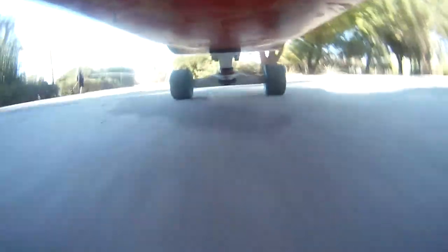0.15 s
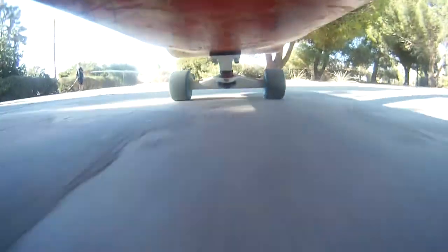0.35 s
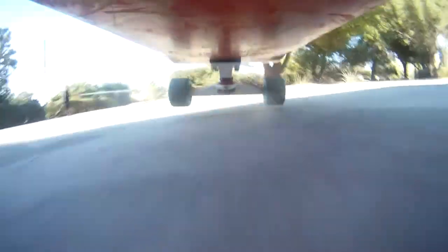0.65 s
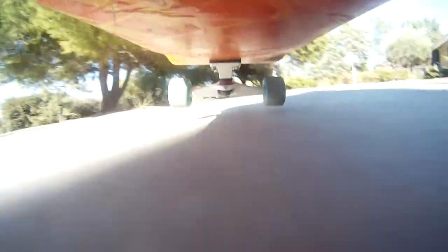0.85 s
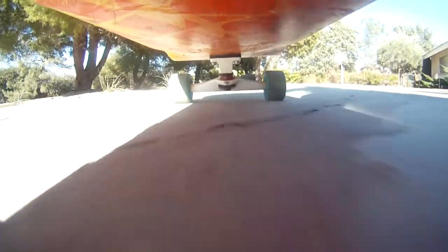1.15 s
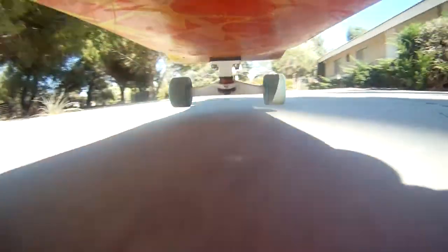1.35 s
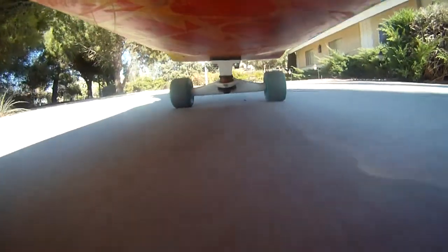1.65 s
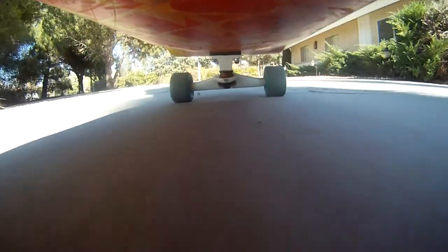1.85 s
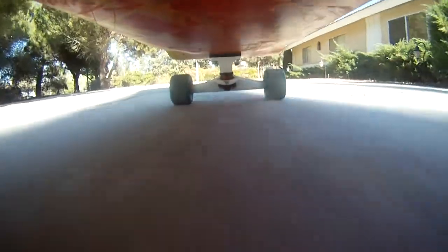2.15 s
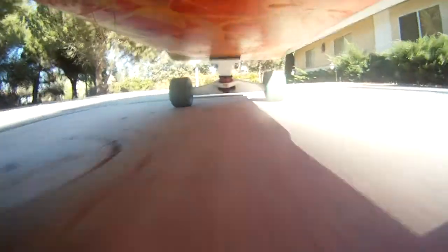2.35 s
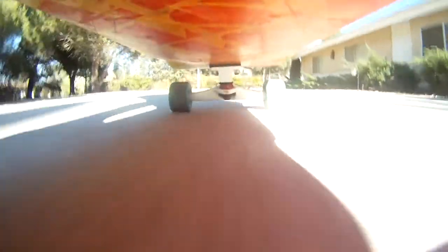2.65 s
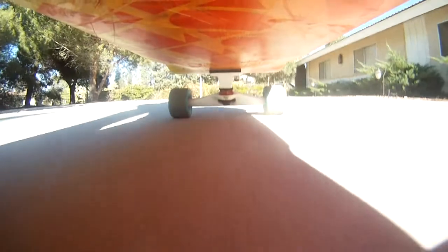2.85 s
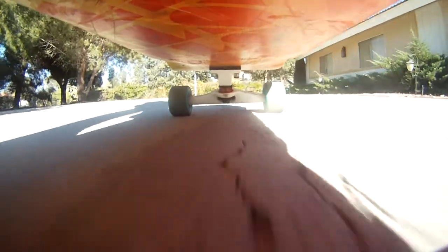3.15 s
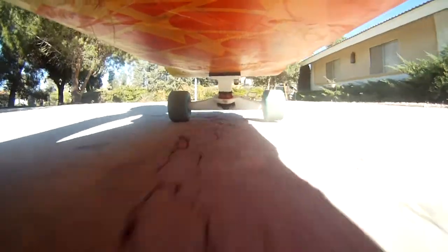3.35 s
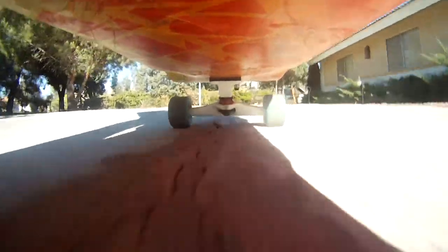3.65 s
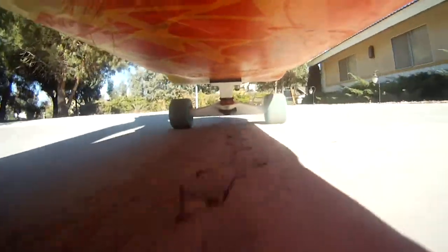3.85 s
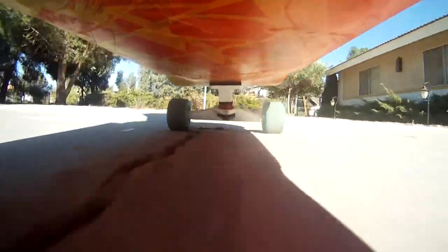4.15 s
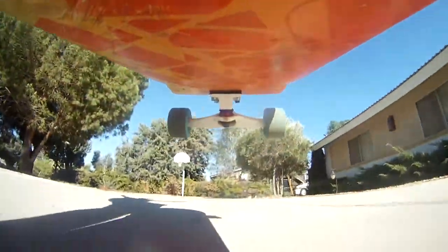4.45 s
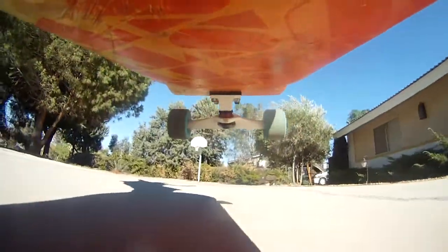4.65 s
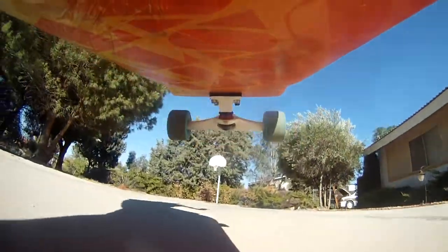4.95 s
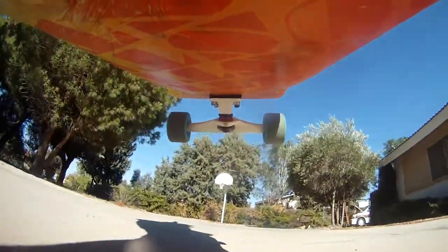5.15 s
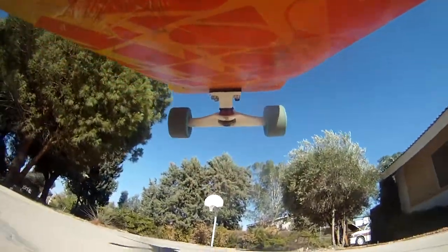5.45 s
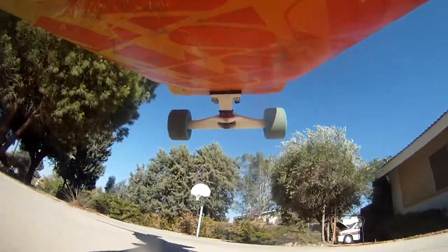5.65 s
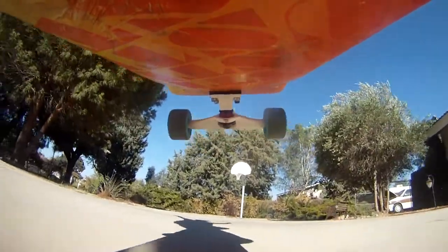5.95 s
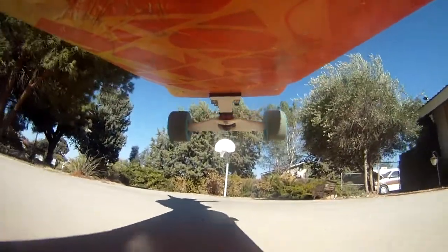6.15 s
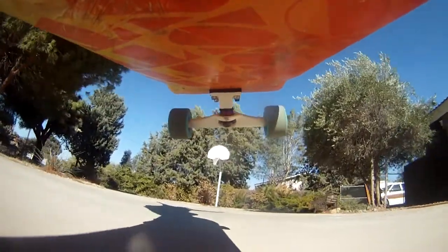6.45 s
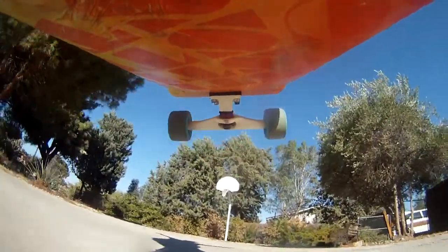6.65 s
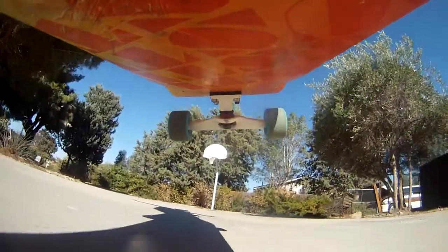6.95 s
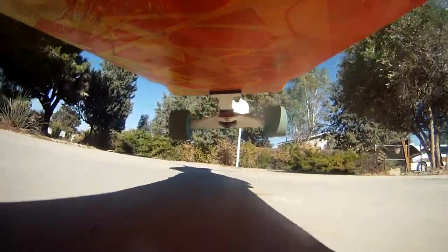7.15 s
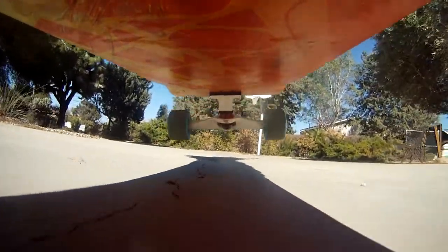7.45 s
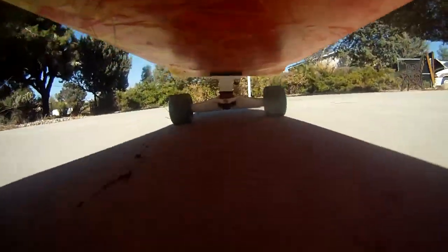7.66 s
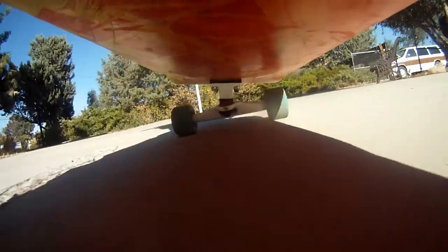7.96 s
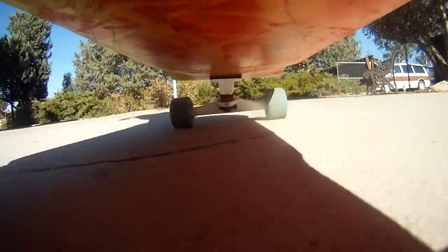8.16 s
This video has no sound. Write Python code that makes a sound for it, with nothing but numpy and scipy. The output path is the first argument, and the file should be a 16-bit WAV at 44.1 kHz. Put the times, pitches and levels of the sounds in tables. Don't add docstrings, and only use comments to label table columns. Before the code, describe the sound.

A skateboard rumbles over rough concrete with hollow wooden roar, rattling loose metal and hard distorted slams at cracks, then a humming, scraping wheelie.

```python
import sys
import numpy as np
from scipy import signal
from scipy.io import wavfile
from scipy.ndimage import uniform_filter1d

SR = 44100
rng = np.random.default_rng(int(sys.argv[2]) if len(sys.argv) > 2 else 0)


def file_out(sig):
    cols = np.atleast_2d(sig).T
    lim = np.clip(cols, -1, 1)
    pcm = np.round(lim * 32767).astype(np.int16)
    wavfile.write(sys.argv[1], SR, pcm)


def boost_factor(decibels):
    exponent = np.asarray(decibels, float) / 20
    return 10 ** exponent


N = 366471
TIME = np.arange(N) / SR

# time in s, clack in dB, thump in dB, drop of the camera's gain in dB.
SLAMS = [(0.087, 4, -7.5, 1), (.104, 1, -18, 20.5), (.14, 0, -9.5, 17.5), (0.58, -2.5, -5.5, 7.5),
         (.953, 1.5, -6, 13), (0.979, 0, -6, 21), (1.113, 2.5, 2, 8), (1.123, 3.5, 1, 9.5),
         (1.261, 2, -11, 29), (1.455, 14, -7, 49), (1.465, 7, -8, 6), (2.073, 2.5, -9, 53),
         (2.243, 8, 4, 33), (2.416, 9.5, 3.5, 60.5), (2.52, 16.5, 5, 37), (2.686, 14, -16, 72.5),
         (3.195, -27, -8, 11), (3.23, -1, -3.5, -7), (3.496, 1, 1.5, 47), (3.501, 0.5, -7, -1),
         (3.673, 0.5, 5, 43.5), (4.383, 10.5, -0.5, 76), (5.379, -3, -31, 2.5), (5.669, -8.5, -22, 5.5),
         (7.599, 12, -10, 59), (7.603, 7.5, -7, 0.5)]
# time in s, blow in dB.
BUMPS = [(0.048, -14), (0.354, -5), (.408, -2.5), (0.553, -6.5), (0.667, 0), (0.706, -4), (0.750, -2.5),
         (0.846, -6.5), (1.193, 0.5), (1.646, -21), (2.037, -1), (2.195, 7), (2.226, 7.5), (2.402, 2),
         (2.703, 10.5), (3.056, -7), (3.343, -5.5), (3.614, -9), (3.814, -16), (4.048, -15), (4.157, -18),
         (4.207, -3.5), (4.238, -6), (4.35, -7.5), (4.371, 2)]
# time in s, blow in dB.
LATE_BUMPS = [(4.597, -6), (4.613, -2), (4.91, -6.5), (5.032, -7), (5.07, -8), (5.125, -6), (5.378, -2),
              (5.527, -5.5), (5.67, -5), (5.829, -6), (5.881, -10), (6.122, -13), (6.199, -7), (6.334, -27),
              (6.515, -17), (6.732, -3), (6.824, -19), (7.055, -4.5), (7.139, -9), (7.303, 0),
              (7.546, -4.5), (7.77, 1), (7.861, -7.5), (7.927, -7), (7.962, -13), (7.998, -2.5),
              (8.021, -12), (8.13, -27)]
# frequency in Hz, width in Hz, level in dB.
BODY = [(157.6, 29, -10.5), (309, 45.4, -4.5), (409.5, 83.4, -3.5), (519, 78.3, 0), (601, 71, 1.5),
        (699.5, 138, -9), (1059, 75, -14.5), (1454, 69, -26)]
# frequency in Hz, width in Hz, level in dB.
CASE = [(2740, 1390, 2), (3400, 656, 9), (5220, 2800, 0)]
# frequency in Hz, width in Hz, level in dB.
AXLE = [(3976, 390, 39), (4660, 300, -10)]
# frequency in Hz, width in Hz, level in dB.
TRUCK = [(734, 310, -0.5), (1078, 155, 1.5), (1477, 195, -5.5)]


def level(x, db):
    return x * boost_factor(db) / np.sqrt(np.mean(x ** 2))


def ring(x, modes):
    out = np.zeros(len(x))
    for k, (hz, width_hz, db) in enumerate(modes):
        b, a = signal.iirpeak(hz, hz / width_hz, fs=SR)
        out += (-1) ** k * boost_factor(db) * signal.lfilter(b, a, x)
    return out


def strike(times, db, modes, push_s, scatter_db, bounce_s, rebound=0.49):
    push = np.sin(np.pi * np.arange(.5, push_s * SR) / (push_s * SR))
    peak = np.abs(ring(np.pad(push, (0, SR // 10)), modes)).max()
    chance = rng.standard_normal((len(times), len(modes) + 2))
    first = (np.asarray(times) * SR).astype(int)
    second = first + (bounce_s * SR * boost_factor(3 * chance[:, -1])).astype(int)
    out = np.zeros(N)
    for k, mode in enumerate(modes):
        size = (-1) ** k * np.sign(chance[:, -2]) * boost_factor(db + scatter_db * chance[:, k])
        kicks = np.zeros(N)
        np.add.at(kicks, first % N, size)
        np.add.at(kicks, second % N, -rebound * size)
        out += ring(np.convolve(kicks, push)[:N], [mode])
    return out / peak


def grit(rate, rough_db):
    k = int(SR / rate)
    steps = np.repeat(rng.standard_normal(N // k + 1), k)
    walk = uniform_filter1d(steps, k)[:N]
    return boost_factor(rough_db * walk) * rng.standard_normal(N)


def swells(rows):
    out = np.zeros((len(rows[0]) - 2, N))
    for centre, length, *db in rows:
        hump = np.cos(np.pi * np.clip((TIME - centre) / length, -.5, .5)) ** 2
        out += np.outer(db, hump)
    return out


def ducking():
    fall_s, rise_s = 0.032, 0.092
    duck_db = np.zeros(N)
    for s, *_, depth_db in SLAMS:
        after = np.maximum(TIME - s, 0)
        duck_db -= depth_db * (1 - np.exp(-after / fall_s)) ** 2 * np.exp(-after / rise_s)
    return duck_db


def plank_flex(flex_db):
    # frequency in Hz, width in Hz, level in dB.
    bend_modes = [(39.7, 54, -10), (77.4, 33.7, 0), (98.8, 26.3, 3), (163.7, 25, -6), (232, 28.4, -8.5),
                  (1370, 2500, -35.5)]
    return boost_factor(flex_db) * level(ring(grit(30, 2.2), bend_modes), 0)


def deck_roar(body_db, low_db):
    shake = grit(90, 1.1)
    roar = boost_factor(low_db) * ring(shake, BODY[:2]) + ring(shake, BODY[2:])
    return boost_factor(body_db) * level(roar, 0.9)


def bearings(hiss_db, axle_db):
    # frequency in Hz, width in Hz, level in dB.
    hiss_modes = [(1890, 410, -1), (3117, 360, 5), (4280, 430, 0), (5100, 420, -6.5)]
    hiss = level(ring(grit(700, 4.5), hiss_modes), -1.5)
    axle_ring = level(ring(grit(130, 6.5), AXLE), -5.5)
    return boost_factor(hiss_db) * (hiss + boost_factor(axle_db) * axle_ring)


def ticks(axle_db, flex_db):
    place, luck = rng.random((1300, 2)).T
    tick_db = -13 - 3.5 * np.log(1 - .95 * luck)
    sound = strike(place * N / SR, tick_db, CASE, push_s=.00012, scatter_db=3.0, bounce_s=.0008, rebound=.3)
    return boost_factor(flex_db - .7 * np.maximum(axle_db, 0)) * sound


def trucks(body_db, flex_db):
    drive_db = -14.5 + body_db + 0.99 * (flex_db - body_db)
    judder = level(ring(grit(120, 4), TRUCK), 0)
    hit_s, hit_db = np.transpose(BUMPS + LATE_BUMPS + [slam[:2] for slam in SLAMS])
    clanks = strike(hit_s, hit_db - 13.5, TRUCK, push_s=0.00031, scatter_db=3.4, bounce_s=0.00393)
    return boost_factor(drive_db) * judder + clanks


def knocks(axle_db):
    # time in s, level as heard in dB.
    early_knocks = [(0.0256, -23), (0.0326, -16.5), (0.057, -14), (0.0605, -13.5), (0.0888, 1),
                    (0.1027, 0.5), (0.1211, -29), (0.1332, -17.5), (0.2022, -25), (0.2135, -24),
                    (0.2266, -25), (0.244, -24), (0.2614, -16), (0.2733, -20), (0.2907, -9.5), (0.3303, -8),
                    (0.3587, -4.5), (0.409, -12.5), (0.4284, -16), (0.443, -22), (0.4599, -9.5),
                    (0.469, -23), (0.477, -19.0), (0.4898, -15), (0.4989, -16), (0.5103, -12), (0.518, -23),
                    (0.5432, -8), (0.5604, -25), (0.5672, -6), (0.5833, -16), (0.5889, -25.5), (0.631, -21),
                    (0.6444, -16), (0.6519, -9.0), (0.6654, -9), (0.6729, -14), (0.6793, -13.0),
                    (0.6876, -19), (0.7085, -22), (0.7205, -10), (0.751, -16.0), (0.7559, -8.5),
                    (0.763, -14.0), (0.7792, -10), (0.784, -15), (0.8492, -19), (0.8556, -17),
                    (0.8805, -16), (0.951, -5), (0.956, -5), (0.959, -3), (0.9663, -14), (0.9734, -16),
                    (0.9807, -12), (0.984, -8.0), (0.9948, -24), (1.0432, -19), (1.0841, -18),
                    (1.1166, -3.5),
                    (1.1245, -5), (1.129, -7), (1.1375, -14), (1.1467, -24), (1.1924, -20), (1.2408, -3.5),
                   (1.245, -7), (1.261, 0.5), (1.269, -3), (1.2741, -7), (1.2954, -11), (1.3179, -23),
                   (1.457, -8), (1.463, -11), (1.4672, -8), (1.475, -15), (1.4802, -18), (1.4895, -29),
                   (1.5121, -34), (1.543, -26), (1.6256, -22), (1.654, -18), (1.753, -17.5), (1.852, -18),
                   (1.941, -6), (1.9844, -4.5), (1.9887, -10), (2.04, -12), (2.0455, -12), (2.0557, -14),
                   (2.0751, -0.5), (2.0854, -19), (2.102, -25), (2.1058, -19), (2.1143, -22), (2.1418, -31),
                   (2.1621, -27), (2.168, -32), (2.1983, -13), (2.201, -18), (2.2069, -21), (2.2333, -10),
                   (2.2404, -4), (2.258, -7), (2.276, -10.5), (2.2884, -10), (2.2971, -13), (2.3038, -11),
                   (2.3286, -22.0), (2.3381, -21), (2.3489, -22), (2.3552, -19), (2.3643, -15),
                   (2.373, -18), (2.382, -21.0), (2.4037, -15), (2.408, -14), (2.4173, -6), (2.4408, -21),
                   (2.4537, -24),
                    (2.467, -39), (2.4976, -36), (2.5125, -12), (2.519, -9.5), (2.5354, -26),
                   (2.5538, -16.5), (2.565, -21), (2.5901, -35), (2.5996, -25), (2.6287, -30),
                   (2.664, -14.5), (2.6748, -12), (2.686, -16), (2.693, -8), (2.704, -13), (2.717, -24),
                   (2.8136, -22), (2.8467, -13.5), (2.8563, -22), (2.8806, -21), (2.9831, -16),
                   (3.0608, -19), (3.064, -1.5), (3.071, -22), (3.0835, -25), (3.1229, -11.5),
                   (3.1307, -25), (3.141, -20), (3.147, -15), (3.151, -20.5), (3.1558, -10),
                   (3.1624, -21.5), (3.1747, -22.0), (3.179, -19), (3.195, -8), (3.1999, -26), (3.205, -16),
                   (3.235, -10), (3.241, -14.5), (3.2487, -19.5), (3.254, -21.5), (3.2623, -22),
                   (3.2843, -19), (3.2899, -22), (3.2987, -24), (3.3074, -23.0), (3.337, -16.5),
                   (3.3407, -12), (3.3462, -9), (3.3513, -10), (3.3604, -11), (3.369, -11), (3.374, -12.5),
                   (3.383, -16), (3.3862, -12), (3.39, -13), (3.412, -10), (3.4176, -16), (3.4254, -11.5),
                   (3.4381, -24)]
    # time in s, level as heard in dB.
    late_knocks = [(3.4526, -25), (3.4742, -16), (3.482, -5), (3.4884, -12.0), (3.4951, -9), (3.5, 0),
                   (3.5211, -22.5), (3.5306, -22), (3.5483, -33.5), (3.5593, -37.0), (3.5705, -34.0),
                   (3.5791, -33), (3.5921, -37), (3.6138, -22), (3.617, -21), (3.6238, -26), (3.6485, -16),
                   (3.6536, -16), (3.6624, -16), (3.6734, -7), (3.701, -23), (3.7157, -35.5),
                   (3.7337, -34.5), (3.745, -29), (3.7513, -22), (3.7564, -25), (3.7663, -22.0),
                   (3.7746, -18.5), (3.7789, -21.0), (3.7934, -24.5), (3.8033, -27.5), (3.8082, -25),
                   (3.8122, -15.5), (3.8165, -20), (3.8445, -28), (3.8584, -21), (3.871, -17.5),
                   (3.8893, -20), (3.9454, -20), (3.9593, -21), (3.9649, -20.5), (4.002, -17),
                   (4.0333, -20.5), (4.0383, -19), (4.0458, -21), (4.065, -18), (4.069, -20), (4.2395, -9),
                   (4.244, -10), (4.2661, -16), (4.2784, -7.5), (4.2921, -15), (4.3394, -10), (4.352, -10),
                   (4.3842, -11), (4.4182, -36.0), (4.4234, -35), (4.4356, -36), (4.5553, -27.0),
                   (4.6159, -21),
                   (4.7141, -9), (4.7257, -18), (4.7419, -11), (4.7482, -14), (4.7731, -19),
                      (4.7836, -4), (4.7969, -19), (4.8192, -15), (4.8449, -21), (4.8493, -13),
                      (4.8553, -17), (4.862, -15), (4.8727, -18), (4.8788, -20.0), (4.884, -18),
                      (4.8897, -10), (4.8961, -21), (4.9559, -14.5), (4.9614, -29), (4.9692, -24.5),
                      (5.004, -27), (5.0641, -12.5), (5.076, -10), (5.0882, -21.0), (5.0937, -26),
                      (5.1189, -27), (5.1495, -27), (5.1777, -14), (5.1846, -13.0), (5.1972, -22),
                      (5.2021, -20), (5.2131, -18), (5.217, -22), (5.2204, -16), (5.2492, -15),
                      (5.2538, -18.0), (5.259, -17), (5.2672, -25), (5.275, -15), (5.3457, -26),
                      (5.3812, -1.5), (5.6683, -7), (5.8153, -21), (5.8207, -12), (5.8775, -19.5),
                      (5.897, -15.5), (5.9022, -15.5), (5.9587, -26), (6.062, -19.5), (6.0676, -23),
                      (6.1955, -20.5), (6.202, -13), (6.2273, -21), (6.2348, -20), (6.2746, -22),
                      (6.309, -31), (6.4542, -23), (6.4611, -24), (6.4707, -26), (6.4769, -39),
                   (6.5173, -16.5), (6.5518, -23), (6.5635, -17.5), (6.5692, -23.5), (6.6292, -13),
                      (6.6337, -17), (6.638, -20.5), (6.738, -5), (7.0927, -17), (7.3355, -10),
                      (7.4381, -10.5), (7.45, -15), (7.4634, -11.5), (7.4711, -27), (7.4749, -26),
                      (7.543, -3.5), (7.6034, 0), (7.6897, -23), (7.7147, -28), (7.726, -21.5),
                      (7.7379, -34), (7.7628, -18), (7.774, -13.5), (7.7911, -23), (7.7981, -22),
                      (7.804, -20), (7.847, -15.5), (7.864, -15.5), (7.875, -16), (7.887, -17),
                      (7.9035, -24), (7.9162, -11.5), (7.947, -18), (7.9554, -12), (7.9968, -23),
                      (8.0096, -25), (8.0141, -22), (8.0174, -7), (8.022, -23), (8.0302, -17), (8.033, -9),
                      (8.0426, -19), (8.047, -17), (8.051, -14), (8.0554, -15), (8.0596, -12),
                      (8.0667, -9.5), (8.0717, -15), (8.096, -16), (8.1013, -20.0), (8.1187, -17.5),
                      (8.1294, -18.5), (8.1451, -9), (8.1498, -24), (8.1543, -24), (8.1643, -28),
                      (8.193, -7.5), (8.2186, -15), (8.253, -22), (8.2623, -25)]
    early = early_knocks
    late = late_knocks
    s, heard_db = np.transpose(early + late)
    db = heard_db - np.interp(s, TIME, ducking())
    lean_db = np.interp(s, TIME, axle_db)
    case_db = db + 0.5 - 0.3 * np.maximum(lean_db, 0)
    axle_hit_db = db - 10.5 + 0.5 * np.minimum(lean_db, 24)
    out = strike(s, case_db, CASE, push_s=.00012, scatter_db=1.08, bounce_s=0.00054, rebound=0.19)
    out += strike(s + 0.001795, db - 13.5, CASE, push_s=0.00012, scatter_db=3.4, bounce_s=.0016, rebound=0.85)
    out += strike(s, axle_hit_db, AXLE, push_s=0.00028, scatter_db=3.6, bounce_s=0.001026)
    return out


def bumps():
    s, db = np.transpose(BUMPS + LATE_BUMPS)
    return strike(s, db - 4.0, BODY, push_s=0.00056, scatter_db=5.4, bounce_s=0.003)


def slams():
    # frequency in Hz, width in Hz, level in dB.
    clack_modes = [(391, 288, -2), (572, 197, 2), (1107, 86, -5.5), (1310, 170, -10)]
    # frequency in Hz, width in Hz, level in dB.
    thump_modes = [(110, 260, -4), (223, 150, 3)]
    s, clack_db, thump_db, _ = np.transpose(SLAMS)
    clacks = strike(s - .0007, clack_db, clack_modes, push_s=0.00067, scatter_db=1.0, bounce_s=0.00463)
    thumps = strike(s, thump_db, thump_modes, push_s=0.0015, scatter_db=0.35, bounce_s=0.00422)
    cracks = strike(s + 0.0022, clack_db - 10.5, CASE, 0.00016, scatter_db=0.82, bounce_s=0.002, rebound=0.43)
    return clacks + thumps + cracks


def squeak():
    # start in s, end in s, first pitch in Hz, last pitch in Hz, level in dB.
    slip = (.333, .372, 4200, 5050, -22)
    start, end, from_hz, to_hz, db = slip
    part = np.clip((TIME - start) / (end - start), 0, 1)
    wobble = 25 * uniform_filter1d(rng.standard_normal(N), size=60)
    hz = (from_hz + (to_hz - from_hz) * part ** 0.48) * (1 + 0.0052 * wobble)
    fade = np.sqrt(np.sin(np.pi * part).clip(0))
    return boost_factor(db) * fade * np.sin(2 * np.pi * np.cumsum(hz) / SR)


def swings():
    # time in s, swing in dB.
    weight_drops = [(0.454, -9), (.55, -8), (2.038, -15), (2.554, 8), (3.101, -6.5), (3.143, -7),
                    (3.199, -7.5), (3.612, -1), (3.631, -5), (4.162, -17), (7.767, -5.5), (8.191, -14.5)]
    # frequency in Hz, width in Hz, level in dB.
    plank_modes = [(65, 5.4, -2), (94, 14, 1.5), (152, 41, -5.5)]
    s, db = np.transpose(weight_drops)
    return strike(s, db, plank_modes, push_s=0.0035, scatter_db=0.58, bounce_s=0.0067)


def slack():
    # time in s, level in dB.
    clanks = [
        (.952, -3.5),
        (1.8, -4),
        (.705, -13),
    ]
    s, db = np.transpose(clanks)
    return strike(s, db, TRUCK[1:], push_s=0.00022, scatter_db=0, bounce_s=0.00328)


def wheelie(body_db):
    # frequency in Hz, width in Hz, level in dB.
    pivot_modes = [(87.2, 7, 0.5), (159.3, 9.3, -2.5)]
    lifted = (TIME > 4.45) & (TIME < 7.58)
    fade = uniform_filter1d(1. * lifted, size=2000)
    return fade * boost_factor(body_db - 12.5) * level(ring(grit(25, 3.0), pivot_modes), 0)


def tail():
    # time in s, level in dB.
    drags = [
        [(5.3795, -7), (5.39, -16.5), (5.5, -14.5), (5.6, -14), (5.675, -15.5), (5.69, -17), (5.735, -19),
         (5.742, -58)],
        [(6.733, -16), (6.745, -11.5), (6.78, -16.5), (6.788, -29)],
        [(6.615, -34), (6.632, -30.5), (6.655, -35)],
        [(4.778, -14.5), (4.79, -32)],
        [(7.53, -30), (7.544, -23), (7.555, -24)],
    ]
    # frequency in Hz, width in Hz, level in dB.
    tail_modes = [(745, 150, -10.5), (1070, 110, 0.5), (1400, 750, -8), (2420, 1700, -8), (2830, 250, -1),
                  (3680, 520, -11.5), (5080, 1330, -11.5)]
    envelope = np.zeros(N)
    for drag in drags:
        s, db = np.transpose(drag)
        envelope += boost_factor(np.interp(TIME, s, db, left=-99, right=-99))
    chatter = grit(1800, 4) * grit(110, .4)
    return envelope * level(ring(chatter, tail_modes), 0)


def scene():
    # time in s, shake by the surface in dB, plank flex over shake in dB,
    # bearing load over shake in dB, axle ring over case ring in dB.
    roll = [(0, -30.5, 2.5, -24.5, 12), (.25, -24, 2.5, -13.5, 5.5), (.6, -26.5, 3.5, -20, 3),
            (.95, -22.5, 1, -13, 0.5), (1.3, -13.5, 3.5, -20, 9.5), (1.5, -22, -10, -13.5, 0),
            (1.85, -15, -3, -34, 15.5), (2.1, -16.5, 3.5, -24, -1), (2.7, -13, -1.5, -18, 1),
            (2.95, -17, -5, -15, -1.5), (3.3, -25, 2.5, -26.5, -6), (4.0, -21.5, 0, -17.5, 3),
            (4.55, -17, -13, -14.5, 3), (5.2, -18.5, -10, -18.5, -33), (6.0, -23.5, -5, -22.5, -2),
            (6.85, -22, -8.5, -18.5, -13), (7.5, -19, -0.5, -16.5, -3), (8.31, -21, 1, -25, -1.5)]
    # centre in s, length in s, extra shake in dB, extra flex in dB.
    patches = [(0.115, 0.15, 1.5, 3), (0.411, 0.31, 6.5, 1), (0.717, 0.39, 7.5, -4.5), (1.08, 0.14, 7, -8),
               (1.304, 0.13, 8, 1), (1.58, 0.39, 6.5, 5), (2.002, 0.16, -2.5, 7), (2.25, 0.26, 10.5, -3.5),
               (2.532, 0.29, 9, 1.5), (2.737, 0.24, 4, 9), (3.1, 0.22, 1.5, 5.5), (3.416, 0.25, 6, -3.5),
               (3.722, 0.49, 11.5, -7), (4.188, 0.24, 5, 6.5), (4.395, 0.23, 0.5, 10),
               (4.777, 0.51, 5, -0.5), (5.275, 0.39, 5, -1), (5.546, 0.5, 2.5, -7), (5.834, 0.28, 6, -6),
               (6.161, 0.35, 10.5, -7.5), (6.325, 0.15, 6, 1.5), (6.48, 0.27, 9.5, -3.5),
               (6.715, 0.32, 2, -5), (7.061, 0.52, 6, -4.5), (7.244, 0.3, 4.5, 0), (7.464, 0.08, 2, 8),
               (8.032, 0.36, 4.5, -12), (8.31, 0.063, 6.5, -2)]
    # centre in s, length in s, change of the lowest deck tones in dB,
    # change of the bearing hiss in dB.
    shifts = [(.7, 0.37, -2, 4.5), (1.62, 0.16, 4, 0), (3.4, .3, 0, 7), (4.2, 0.13, 0, 6),
              (4.95, 1, 1, -1.5), (5.7, 0.31, 4.5, 0), (7.2, 0.68, -0.5, 5.5), (7.68, 0.11, -4, 8),
              (8.05, 0.45, 4.5, 3)]
    # centre in s, length in s, extra ring in dB.
    loose = [(.77, 0.074, 4), (1.08, 0.035, 0), (1.42, 0.093, 4), (3.41, .1, 4), (4.07, 0.13, -6),
             (5.58, .15, 14), (6.05, 0.24, 11), (7.2, 0.43, 7.5), (7.7, 0.21, 24.5), (7.89, 0.2, 26),
             (8.21, 0.05, 24), (8.255, 0.11, 24)]
    s, *columns = np.transpose(roll)
    shake_db, flex_db, load_db, axle_db = (np.interp(TIME, s, column) for column in columns)
    patch_db, bend_db = swells(patches)
    low_db, press_db = swells(shifts)
    body_db = shake_db + patch_db
    flex_db = body_db + flex_db + bend_db
    hiss_db = shake_db + load_db + 0.9 * patch_db + press_db
    axle_db = axle_db + swells(loose)[0]

    sound = plank_flex(flex_db) + deck_roar(body_db, low_db)
    sound += bearings(hiss_db, axle_db) + ticks(axle_db, flex_db)
    sound += trucks(body_db, flex_db)
    sound += knocks(axle_db) + bumps() + slams()
    sound += squeak() + swings() + slack()
    sound += wheelie(body_db) + tail()
    return sound[None]


def top_cut(x):
    return signal.sosfilt(signal.butter(12, 15790, fs=SR, output="sos"), x)


def record(dry):
    hum = level(ring(rng.standard_normal(N), [(500, 1000, 0)]), -69)
    low_pass = signal.butter(6, 5400, fs=SR, output="sos")
    smooth = signal.sosfilt(low_pass, dry * boost_factor(ducking()) + hum)
    coarse = np.clip(signal.resample_poly(smooth, 40, 147, axis=1), -1.03, 1.03)
    held = np.repeat(coarse, 4, axis=1)
    held = signal.resample_poly(held, 147, 160, axis=1)[:, :N]
    kept = signal.sosfiltfilt(signal.ellip(8, .1, 40, 15200, fs=SR, output="sos"), held)
    top = held - kept
    click = uniform_filter1d(top ** 2, size=128) > 3.8 * uniform_filter1d(top ** 2, size=2048)
    near_click = uniform_filter1d(1. * click, size=700) > 1e-6
    gate = uniform_filter1d(1. * near_click, size=256)
    mix = (kept + boost_factor(-13) * gate * top).clip(-1, 1)
    return top_cut(mix)


dry = scene()
out = record(dry)
file_out(out)
```